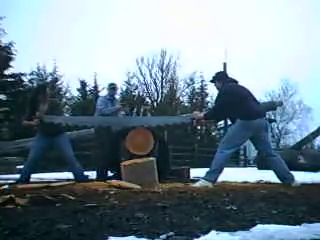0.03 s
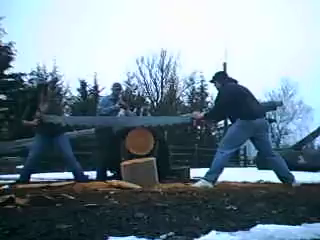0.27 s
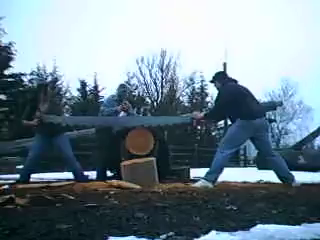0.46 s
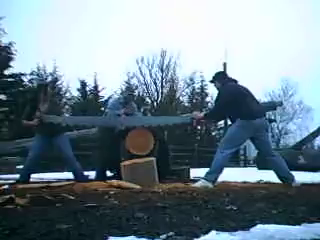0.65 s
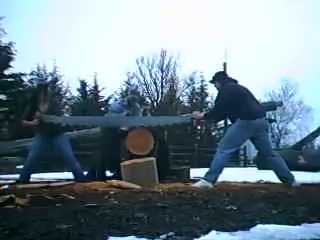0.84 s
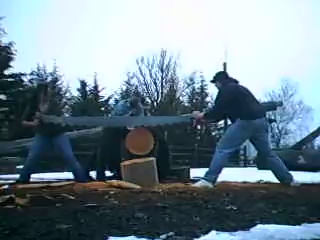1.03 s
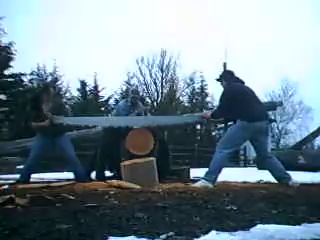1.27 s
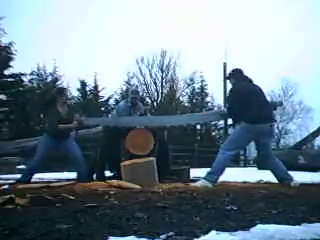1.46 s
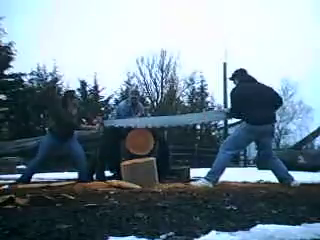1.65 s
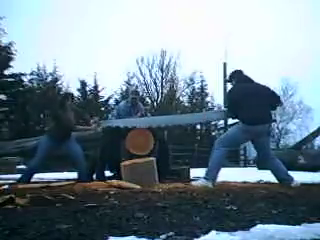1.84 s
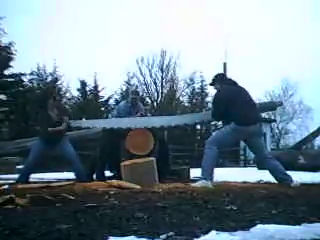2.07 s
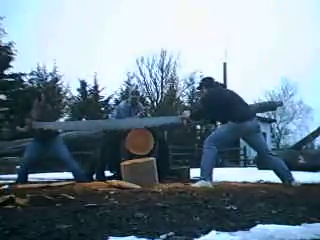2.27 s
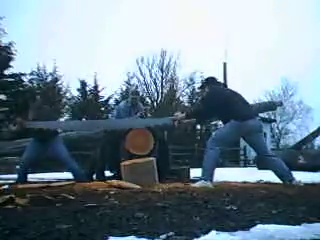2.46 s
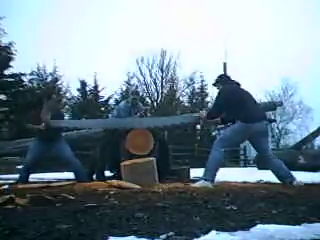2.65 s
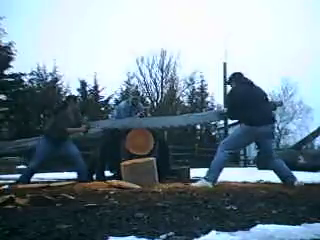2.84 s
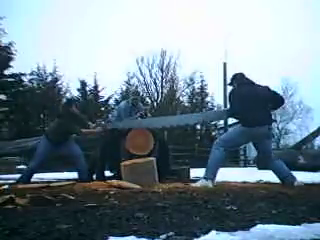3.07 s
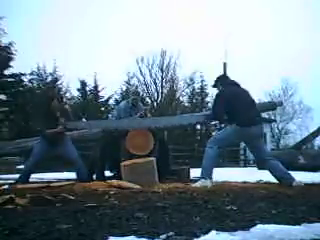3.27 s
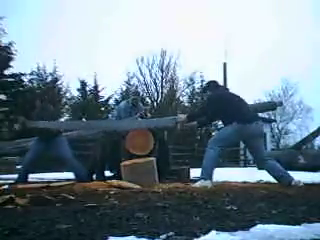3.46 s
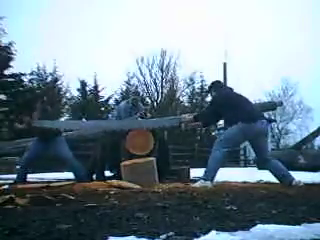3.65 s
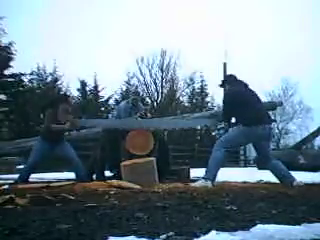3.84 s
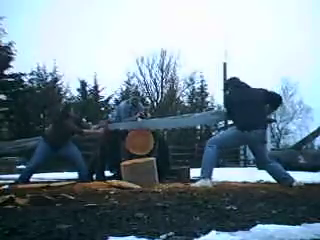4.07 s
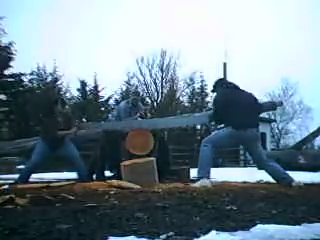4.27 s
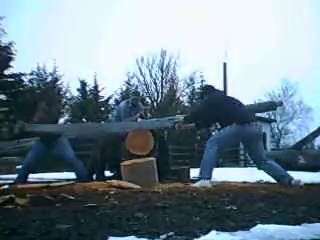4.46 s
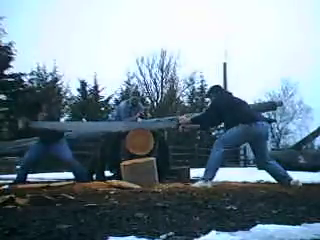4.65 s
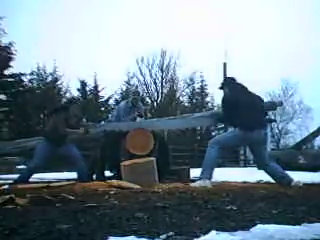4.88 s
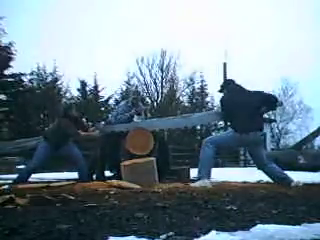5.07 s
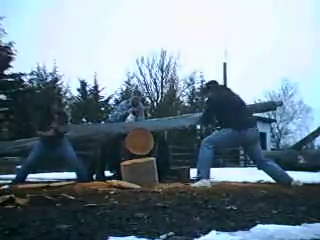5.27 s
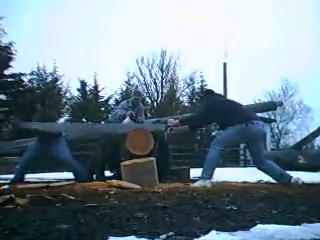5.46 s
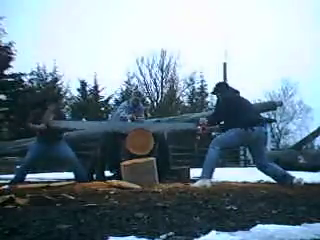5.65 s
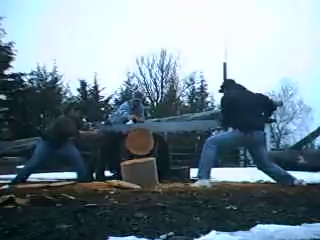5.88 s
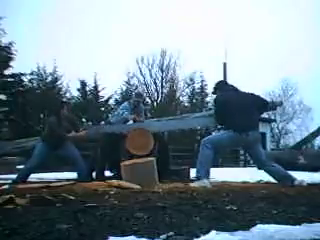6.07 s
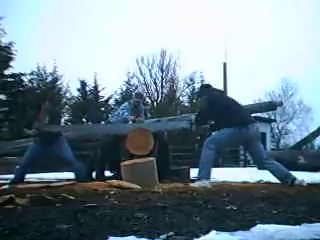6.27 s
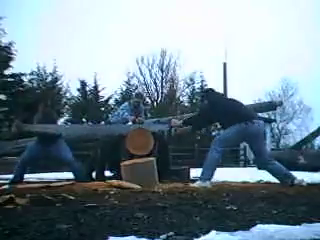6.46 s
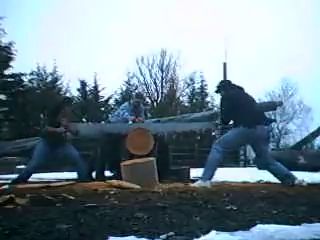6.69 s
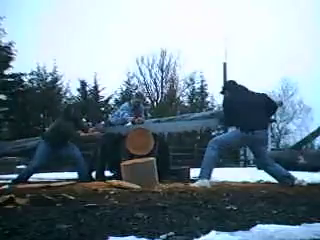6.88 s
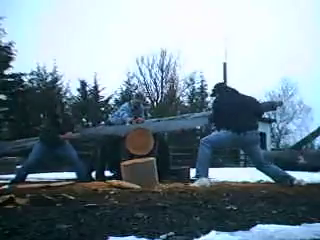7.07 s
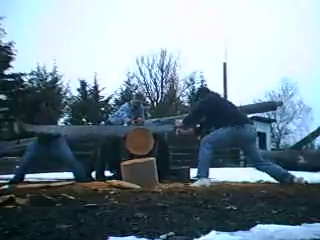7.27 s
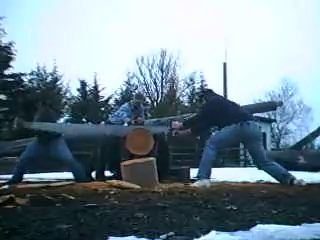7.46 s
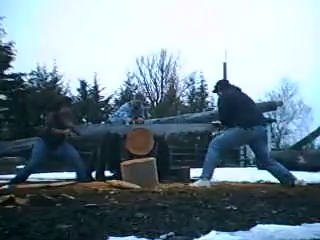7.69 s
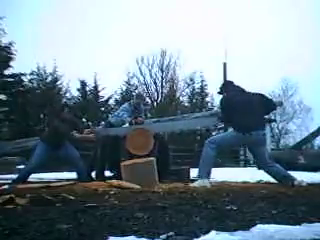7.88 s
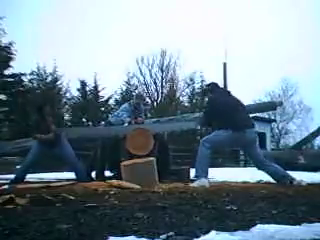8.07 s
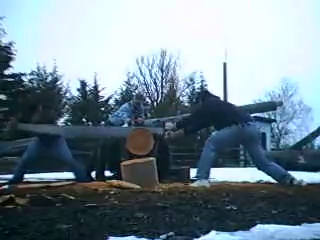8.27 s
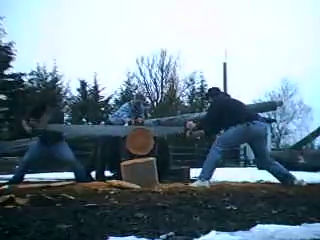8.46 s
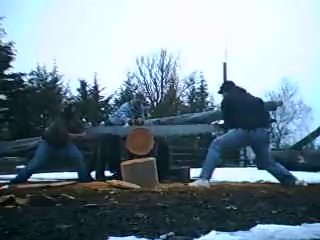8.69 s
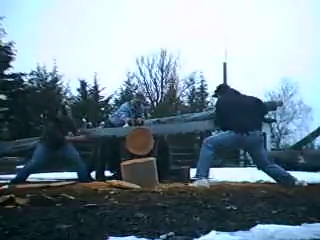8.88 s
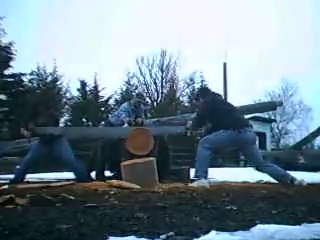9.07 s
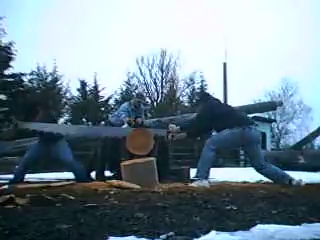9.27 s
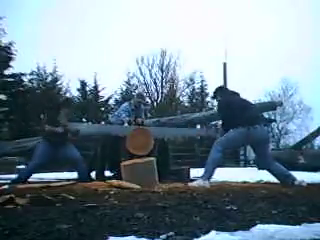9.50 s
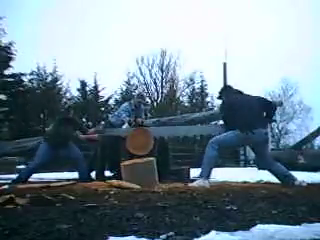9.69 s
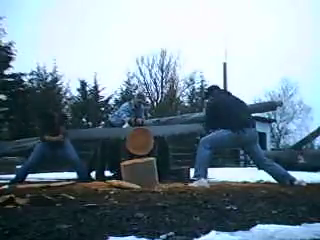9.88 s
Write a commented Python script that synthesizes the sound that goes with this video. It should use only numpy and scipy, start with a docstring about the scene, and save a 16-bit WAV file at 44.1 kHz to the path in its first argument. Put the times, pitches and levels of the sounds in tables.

```python
"""A harsh to-and-fro rasp with a steely ring: two people pull a long crosscut saw through a log outdoors.
Teeth tear fibres in dense random clicks that excite resonances and ring the blade; the rasp sinks at each turn.
The microphone is a small camera's: 8 kHz sampling, steady hiss with a faint tone and buzz.
Its converter overloads, and the clipped crests fold back as a crackling rumble under the rasp."""
import sys
import numpy as np
from scipy import signal
from scipy.fft import rfft, irfft, next_fast_len
from scipy.io import wavfile

SR = 44100
rng = np.random.default_rng(int(sys.argv[2]) if len(sys.argv) > 2 else 0)


def output_pcm(signal):
    """Save a mono or channel-first signal as 16-bit PCM at the path in sys.argv[1].

    Samples are clipped to [-1, 1] before scaling.
    """
    pcm = np.clip(np.atleast_2d(signal).T, -1, 1) * 32767
    wavfile.write(sys.argv[1], SR, np.round(pcm).astype(np.int16))


N = 437908  # samples
TIME = np.arange(N) / SR  # s

# Saw strokes, one a row: turn [t/s], rasp at the turn [level/dB], teeth catch after the turn [t/s],
# rasp at the catch [level/dB], wood tearing at the catch [level/dB], teeth dig in after the turn [t/s],
# cut lasts [t/s], crest at share of the cut [0-1], rasp at the crest [level/dB],
# wood tearing at the crest [level/dB], upper-band trim [level/dB], lower-flank trim [level/dB]
STROKES = [(1.16, -42, .08, -20.5, -39, .22, .32, .6, -14, -27, 3, 0),
           (1.841, -34, .105, -15.5, -29, .22, .355, .75, -11.5, -23, 1.5, -2),
           (2.52, -27, .095, -12.5, -26, .2, .29, .2, -11.5, -23, 0, -4),
           (3.141, -25.5, 0.033, -15, -35, .13, .29, .6, -9, -19, 0.1, -3),
           (3.65, -23, .07, -9.5, -28, .17, .25, .6, -9.5, -21, 1, -4.5),
           (4.192, -24, 0.057, -13, -38, .11, .285, .7, -8.5, -19, -0.3, -4),
           (4.668, -19.5, .035, -13, -28, .09, .3, .8, -9.5, -20, 2, -3),
           (5.143, -23, 0.076, -11, -24, .11, .265, .6, -8.5, -18, 0.5, -1),
           (5.582, -14, .045, -12, -24, .1, .285, .6, -9, -19, -0.5, -2.5),
           (6.04, -24, 0.1, -13, -31, .14, .28, .7, -8, -19.5, 0.6, -0.6),
           (6.516, -20, .04, -10, -28, .12, .29, .7, -7, -18, -0.5, -2.5),
           (7.038, -21, .08, -10, -25, .14, .24, .7, -7, -18, 0.5, -0.5),
           (7.472, -16.5, 0.045, -10, -22, .1, .305, .6, -7, -18.5, -0.1, -2),
           (7.965, -24, 0.056, -12, -36, .095, .27, .4, -7, -19, 2.5, 0.7),
           (8.414, -17, 0.024, -9, -24, .09, .325, .6, -6.5, -19.5, 0.7, -1),
           (8.884, -22, .07, -11.5, -27, .11, .265, .3, -6.5, -19.5, 2, -1.5),
           (9.329, -17.5, .045, -13, -30, .07, .335, .7, -5, -20, -0.9, -3.5),
           (9.795, -20.5, .07, -10, -30, 0.11, .2, .6, -3, -22, 1.5, -2)]
# Teeth biting hard: moment [t/s], peak before BITE_TRIM_DB [level/dB]
BITES = [(1.3172, -14.5), (1.9427, -6.5), (2.1597, -4.5), (3.045, -9), (4.2236, -7), (4.701, -1),
         (6.5524, -9), (7.0363, -6.5), (9.8008, -13.5)]
# Broad resonances of the rasp, main band: centre [f/Hz], width of one pass [f/Hz], gain in the band [level/dB]
LOWER_RASP = [(2483, 251, 4), (2757, 320, -7)]
# The same for the upper band: [f/Hz], [f/Hz], [level/dB]
UPPER_RASP = [(3087, 520, -13.5), (3452, 310, -7), (3851, 404, -4.5)]
# The same for the flank below the main band: [f/Hz], [f/Hz], [level/dB]
FLANK_RASP = [(1928, 920, -10), (2280, 290, 1.5)]
# Ringing modes of the blade: pitch [f/Hz], relative level [level/dB], decay by 60 dB [t/s]
BLADE_MODES = [(2479, 0, .25), (2555, -4, .2), (2882, -9, .25), (3360, -9, .08), (3500, -10, .08)]
# Teeth skipping for a moment: middle [t/s], drop of the tearing [level/dB]
SKIPS = [(1.629, 5), (2.84, 13.5), (2.901, 4), (3.379, 3.5)]
# Electrical buzz: multiple of BUZZ_HZ [1], rms [level/dB]
BUZZ = [(1, -66.5), (2, -66), (3, -67), (4, -66), (5, -64), (6, -64)]
# Smoothing filter after the converter: corner points [f/Hz], gain [level/dB]
SMOOTHING = [(3300, -1.5), (3600, -3.5), (4000, -15.5), (4300, -25.5), (4550, -42), (4750, -83.5)]

# Tearing fibres
TEARS_PER_S, TEAR_SPREAD_DB, TEAR_BURST_DB = 2500, 2.5, 1.0
WOOD_TOP_HZ = 2020
# Steel: levels relative to the rasp, and how they follow the depth of the cut (dB per dB of tearing)
FLANK_DB, FLANK_PER_WOOD, DEEP_CUT_DB = -1, 0.1, -19
BLADE_SHARE_DB, RING_PER_WOOD = -7.5, -0.4
BITE_TRIM_DB, BITE_T60_S = -4.5, 0.06
STEEL_LOW_HZ = 1526
RING_FADES_DB_PER_S = 0.7  # the deepening kerf damps the blade
RING_GROWS_DB = 6  # over each cut, as the free end of the blade lengthens
# Shape that all strokes share
RELEASE_S, WOOD_RELEASE_S, CATCH_RISE_S = 0.045, 0.025, 0.025
RASP_LINGERS_S = 0.006  # the rasp outlasts the tearing
RASP_SLUMP_DB, RASP_SWELL_DB, RASP_SAG_DB, RASP_RELEASE_SHARE = 2, 3, 1, 0.56
WOOD_AT_TURN_DB, WOOD_SLUMP_DB, WOOD_SWELL_DB, WOOD_SAG_DB = -41, 4.0, 1.5, 3
SKIP_S, RASP_SKIP_SHARE = 0.021, 0.3
# Camera noise; HISS_DB is rms over 0-4 kHz ahead of the bass cut
HISS_DB, HISS_LOW_HZ = -30.5, 510
TONE_HZ, TONE_WIDTH_HZ, TONE_DB = 1280, 30, -51
BUZZ_HZ = 29.9
# Camera: sampling, overload (full scale 1) and output
CAMERA_RATE, INPUT_EDGE_HZ = 8000, 3900
CONVERTER_TOP, BASS_CUT_HZ = 0.66, 87
LIMIT, LIMIT_S = 0.69, 0.00036
OUTPUT_TOP, CUTOFF_HZ = 0.715, 16000


def saw():
    """Torn fibres sound broadly in the wood and drive the steel through the force of each stroke."""
    ring_db, rasp_db, wood_db, upper_db, flank_db = strokes()
    cutting = TIME > STROKES[0][0] - 1 / SR * 0
    force = from_db(rasp_db) * cutting
    steel = rasp(force, wood_db, upper_db, flank_db)
    steel += blade(force, ring_db, wood_db)
    steel += bites()
    # the thin blade radiates little bass
    steel = butter(steel, 2, STEEL_LOW_HZ, "high")
    wood = rms_one(butter(tears(), 2, WOOD_TOP_HZ, "low"))
    return steel + wood * from_db(wood_db) * cutting


def rasp(force, wood_db, upper_db, flank_db):
    """Three bands of resonances; the deeper the cut, the more the rasp spreads below its main one."""
    flank = from_db(FLANK_DB + flank_db + FLANK_PER_WOOD * (wood_db - DEEP_CUT_DB))
    main_band = body(tears(), force, LOWER_RASP)
    lower_flank = body(tears(), force * flank, FLANK_RASP)
    upper_band = body(tears(), force * from_db(upper_db), UPPER_RASP)
    return main_band + lower_flank + upper_band


def blade(force, ring_db, wood_db):
    """Tears ring the blade's modes; a light cut damps the steel less, so it rings clearer at the turns."""
    light_cut_db = RING_PER_WOOD * (wood_db - DEEP_CUT_DB)
    kerf_db = RING_FADES_DB_PER_S * (TIME - STROKES[0][0])
    free = force * from_db(ring_db + light_cut_db - kerf_db)
    clicks = tears()
    weight = np.sqrt(np.sum(from_db(np.array(BLADE_MODES)[:, 1]) ** 2))
    out = np.zeros(N)
    for hz, mode_db, t60 in BLADE_MODES:
        steady = np.std(ring(clicks, hz, t60))
        gain = from_db(mode_db + BLADE_SHARE_DB) / weight / steady
        out += gain * ring(clicks * free, hz, t60)
    return out


def bites():
    """A hard bite is damped by the wood: a short ring at two of the rasp's resonances."""
    blows = np.zeros(N)
    at = [round(s * SR) for s, _ in BITES]
    blows[at] = from_db(np.array(BITES)[:, 1] + BITE_TRIM_DB)
    low = ring(blows, LOWER_RASP[0][0], BITE_T60_S)
    high = ring(blows, UPPER_RASP[1][0], BITE_T60_S)
    return low + high / 2


def strokes():
    """Turn, catch, slump, dig in, swell, sag, let go: ring, rasp, wood, upper band and flank in dB."""
    (turn, turn_db, catch, catch_db, wood_catch_db, dig,
     cut, share, rasp_db, wood_db, upper_db, flank_db) = np.transpose(STROKES)
    catch, dig = turn + catch, turn + dig
    slump = (catch + dig) / 2
    crest, end = dig + share * cut, dig + cut
    next_db = np.append(turn_db[1:], turn_db[-1])
    last_db = rasp_db - RASP_SAG_DB
    released_db = last_db + RASP_RELEASE_SHARE * (next_db - last_db)
    rasp_level, = in_time(
        [turn, catch, slump, dig, crest, end + RASP_LINGERS_S, end + RELEASE_S],
        [turn_db, catch_db, catch_db - RASP_SLUMP_DB, rasp_db - RASP_SWELL_DB, rasp_db,
         last_db, released_db])
    idle = np.full(len(turn), WOOD_AT_TURN_DB)
    wood_level, = in_time(
        [catch - CATCH_RISE_S, catch, slump, dig, crest, end, end + WOOD_RELEASE_S],
        [idle, wood_catch_db, wood_catch_db - WOOD_SLUMP_DB, wood_db - WOOD_SWELL_DB, wood_db,
         wood_db - WOOD_SAG_DB, idle])
    # each skip is a triangular dip, SKIP_S to either side
    skips = sum(db * np.maximum(0, 1 - np.abs(TIME - s) / SKIP_S) for s, db in SKIPS)
    half = np.full(len(turn), RING_GROWS_DB / 2)
    grown, = in_time([dig, end], [-half, half])
    upper, flank = in_time(dig + cut / 2, upper_db, flank_db)
    return grown, rasp_level - RASP_SKIP_SHARE * skips, wood_level - skips, upper, flank


def tears():
    """Fibres snap at random, in uneven sizes and in bursts; rms 1."""
    sizes = from_db(TEAR_SPREAD_DB * np.minimum(rng.exponential(1, N), 4))
    signs = rng.choice([-1, 1], N)
    born = rng.random(N) < TEARS_PER_S / SR
    bursts = from_db(TEAR_BURST_DB * drift(38))
    return rms_one(sizes * signs * born * bursts)


def body(clicks, force, peaks):
    """Clicks under a changing force through parallel resonances, levelled to the force."""
    def through(x):
        # alternating signs between neighbouring resonances
        return sum((-1) ** k * from_db(db) * resonate(x, hz, width)
                   for k, (hz, width, db) in enumerate(peaks))
    return through(clicks * force) / np.std(through(clicks))


def ring(clicks, hz, t60):
    """A unit click sets a decaying sine of starting height 1 ringing."""
    r, w = from_db(-60 / (t60 * SR)), 2 * np.pi * hz / SR
    return signal.lfilter([0, np.sin(w)], [1, -2 * r * np.cos(w), r * r], clicks + 1e-18)


def resonate(x, hz, width_hz):
    """A resonance of about gain 1 on top, applied twice for steep flanks."""
    r = np.exp(-np.pi * width_hz / SR)
    b = (1 - r * r) / 2 * np.array([1, 0, -1])
    a = [1, -2 * r * np.cos(2 * np.pi * hz / SR), r * r]
    return signal.lfilter(b, a, signal.lfilter(b, a, x))


def drift(rate_hz):
    """Slow random wander of rms 1: noise through two equal one-pole low-passes."""
    r = np.exp(-2 * np.pi * rate_hz / SR)
    wander = signal.lfilter([1], [1, -2 * r, r * r], rng.standard_normal(N + SR))
    return rms_one(wander[SR:])  # the first second settles the filter


def in_time(s, *columns):
    """Points (points of a stroke x strokes) joined by straight lines, sample by sample."""
    s = np.maximum.accumulate(np.ravel(np.transpose(s)))
    return [np.interp(TIME, s, np.ravel(np.transpose(c))) for c in columns]


def butter(x, order, hz, kind):
    """Butterworth low- or high-pass."""
    return signal.sosfilt(signal.butter(order, hz, kind, fs=SR, output="sos"), x)


def from_db(db):
    """Gain of a level in dB."""
    return 10 ** (np.asarray(db) / 20)


def rms_one(x):
    """Scale to rms 1."""
    return x / np.sqrt(np.mean(x ** 2) + 1e-20)


def hiss():
    """The camera's hiss, thin in the bass, with a wavering tone of narrow noise and a low harmonic buzz."""
    noise = butter(rng.standard_normal(N), 1, HISS_LOW_HZ, "high")
    tone = rms_one(resonate(rng.standard_normal(N), TONE_HZ, TONE_WIDTH_HZ))
    phase = 2 * np.pi * BUZZ_HZ * TIME
    buzz = sum(from_db(db) * np.sqrt(2) * np.cos(int(round(k)) * phase) for k, db in BUZZ)
    # the camera keeps only the part of the white noise below half its rate
    in_band = from_db(HISS_DB) * np.sqrt(SR / CAMERA_RATE)
    return in_band * noise + from_db(TONE_DB) * tone + buzz


def scene():
    """The saw over the camera's own hiss, one channel."""
    return (saw() + hiss())[None]


def limit(x):
    """Gain dips under every crest above the limit, smoothed over a moment."""
    envelope = np.abs(signal.hilbert(x, next_fast_len(N))[:N])
    gain = np.minimum(1, LIMIT / (envelope + 1e-9))
    window = signal.windows.hann(int(2 * LIMIT_S * SR) + 3)
    return x * np.convolve(gain, window / window.sum(), "same")


def record(dry):
    """Sampled at 8 kHz and clipped, smoothed back to full rate, limited, clipped again, top cut."""
    x = butter(dry[0], 10, INPUT_EDGE_HZ, "low")
    seconds = N // SR + 1
    full = rfft(x, seconds * SR)
    slow = irfft(full[:seconds * CAMERA_RATE // 2 + 1]) * CAMERA_RATE / SR
    # overtones of the clipped peaks fold back below 4 kHz as rumble
    slow = np.clip(slow, -CONVERTER_TOP, CONVERTER_TOP)
    # sampling mirrors the spectrum about 4 kHz; the smoothing filter leaves a little of the mirror
    mirrored = np.resize(np.fft.fft(slow), len(full)) * SR / CAMERA_RATE
    hz = np.arange(len(full)) / seconds
    edge_hz, edge_db = np.transpose(SMOOTHING)
    smoothing = from_db(np.interp(hz, edge_hz, edge_db, right=-140))
    smooth = butter(irfft(mirrored * smoothing)[:N], 1, BASS_CUT_HZ, "high")
    # crests that slip past the limiter are shaved: faint bright ticks
    out = np.clip(limit(smooth), -OUTPUT_TOP, OUTPUT_TOP)
    return signal.sosfilt(signal.cheby2(16, 60, CUTOFF_HZ, fs=SR, output="sos"), out)[None]


dry = scene()
out = record(dry)
output_pcm(out)
```